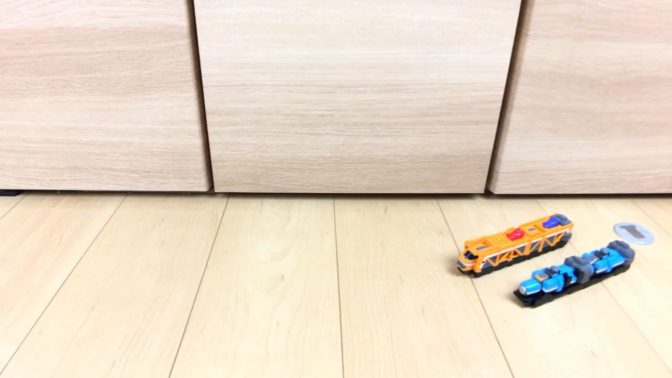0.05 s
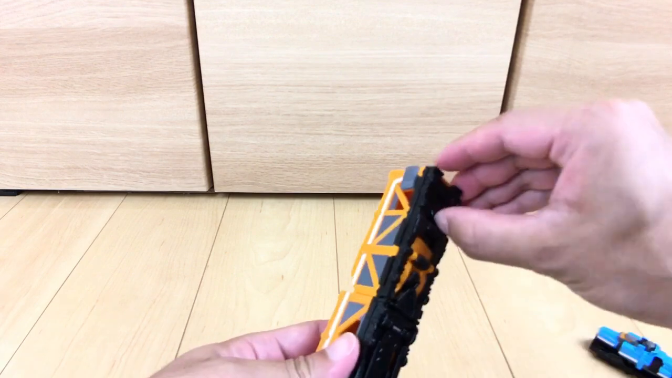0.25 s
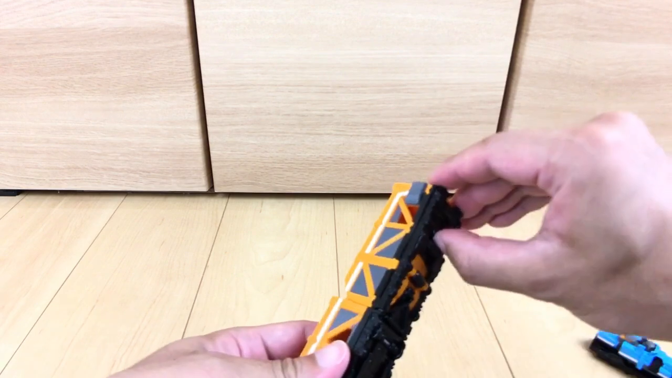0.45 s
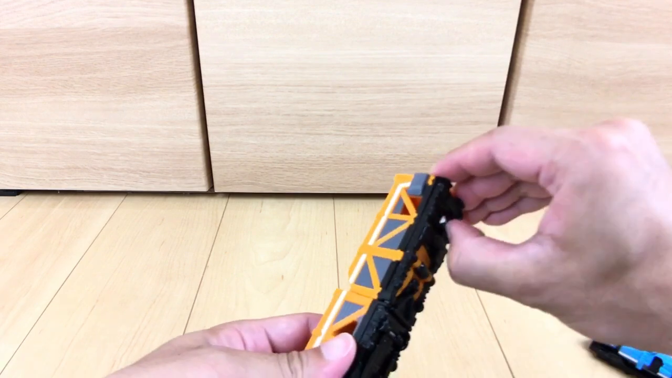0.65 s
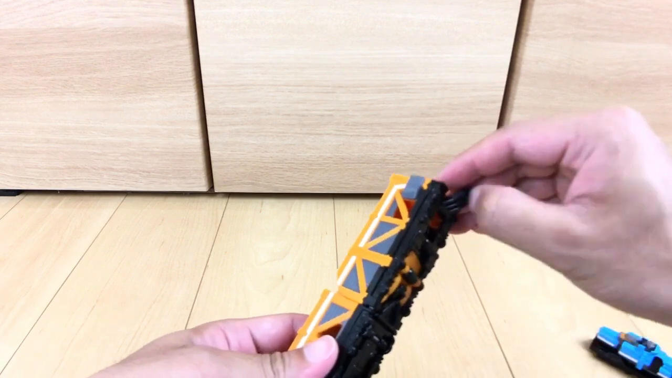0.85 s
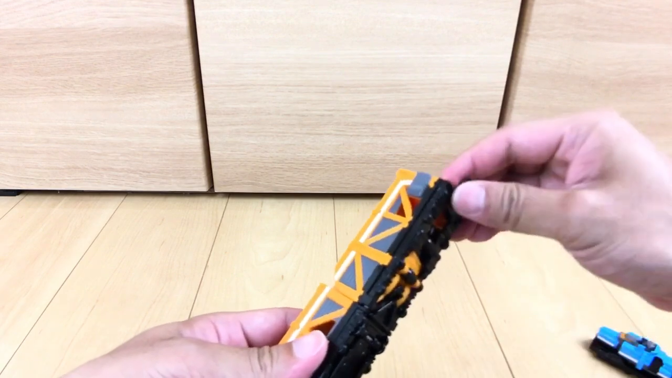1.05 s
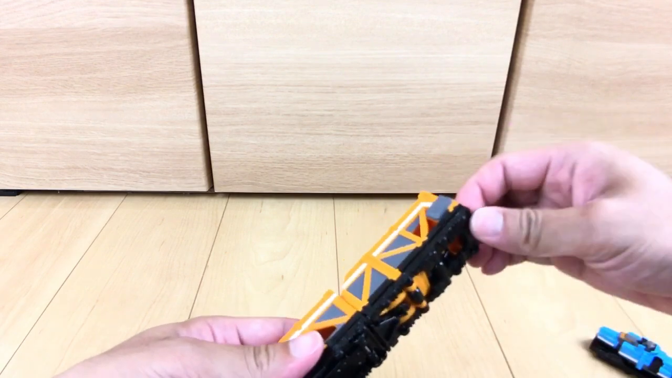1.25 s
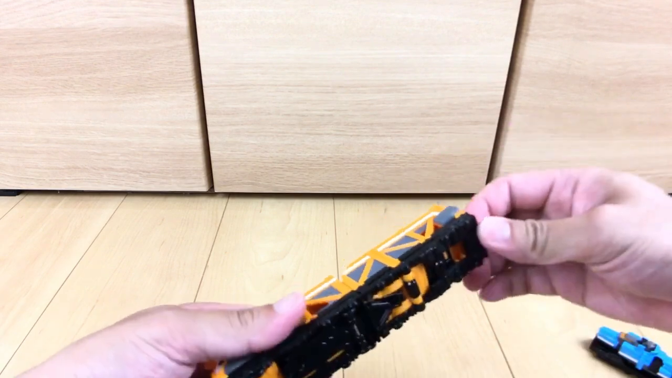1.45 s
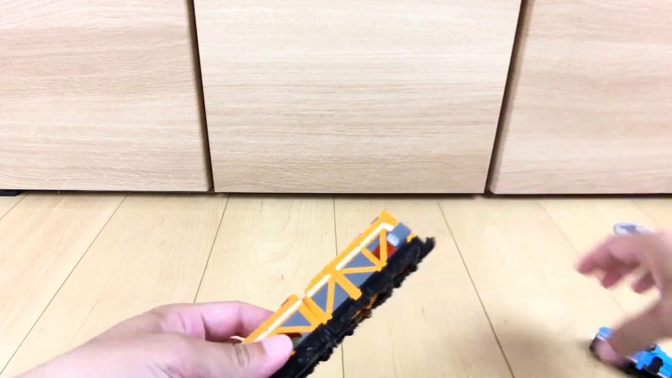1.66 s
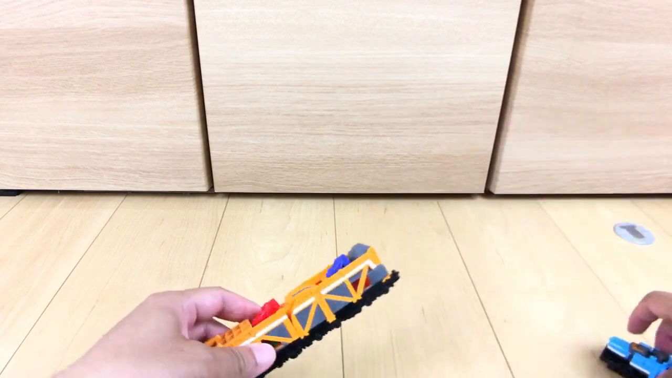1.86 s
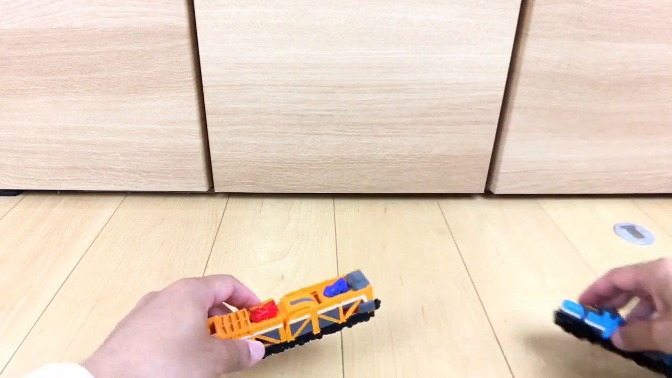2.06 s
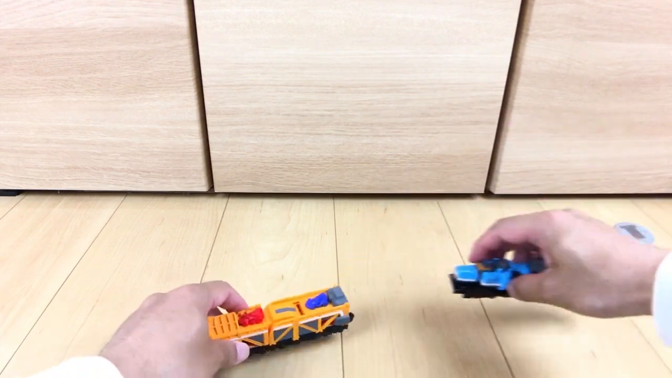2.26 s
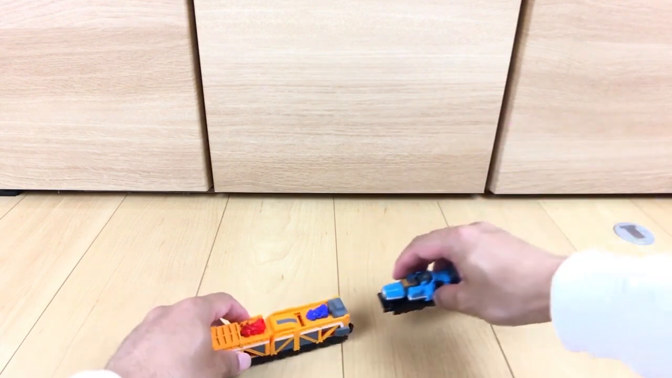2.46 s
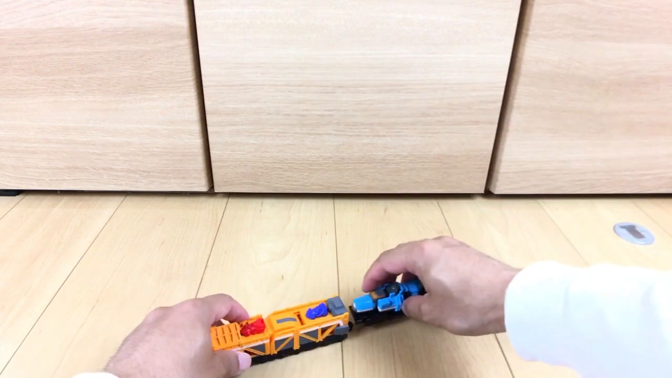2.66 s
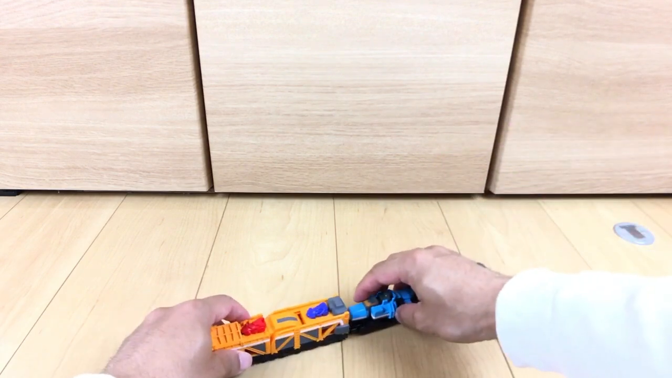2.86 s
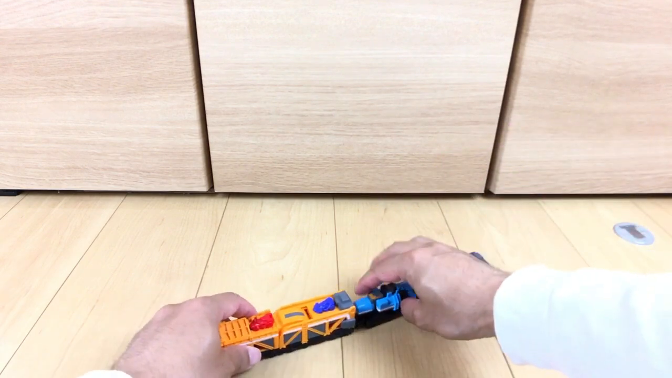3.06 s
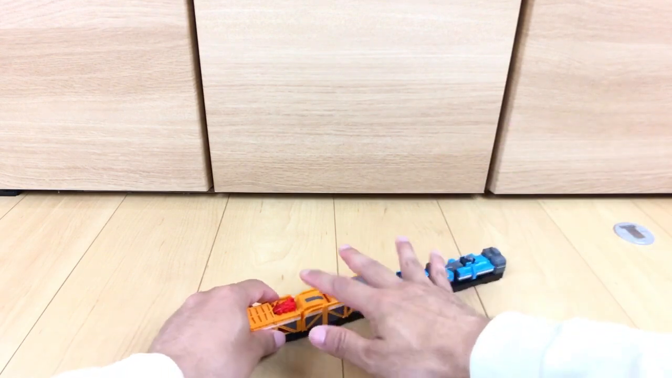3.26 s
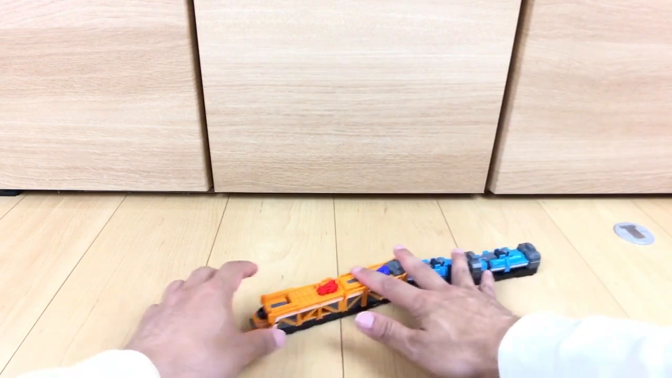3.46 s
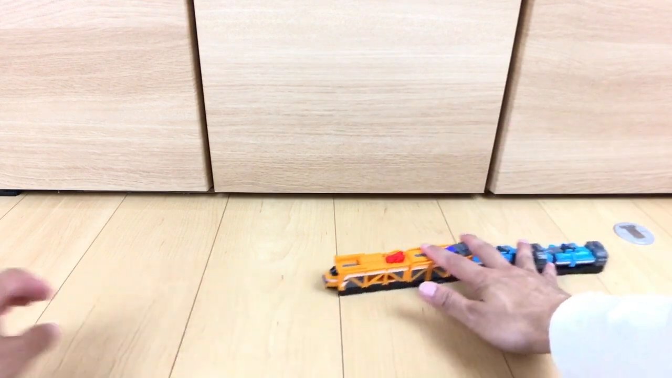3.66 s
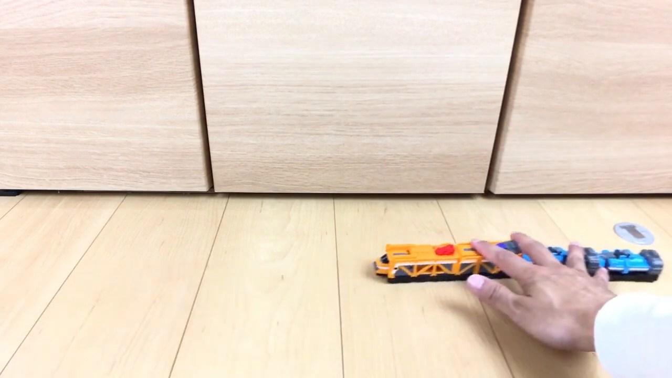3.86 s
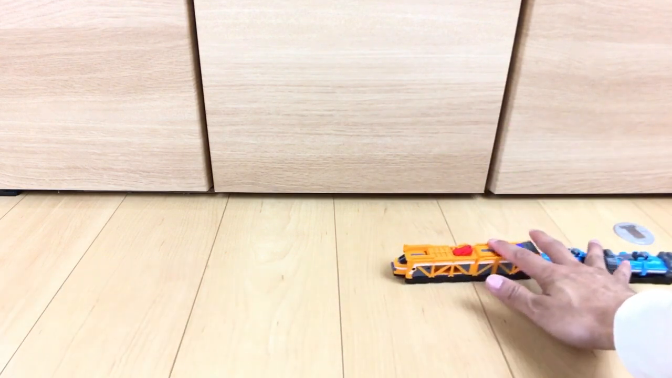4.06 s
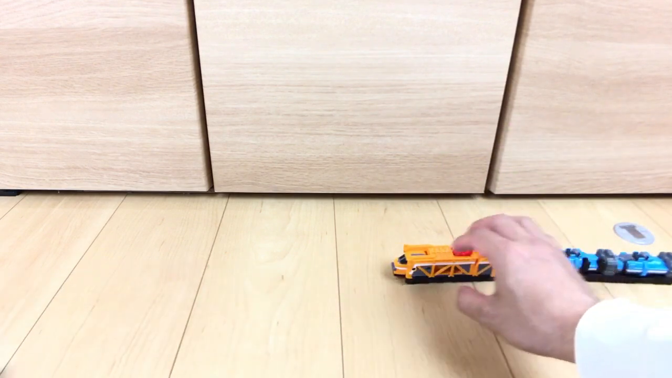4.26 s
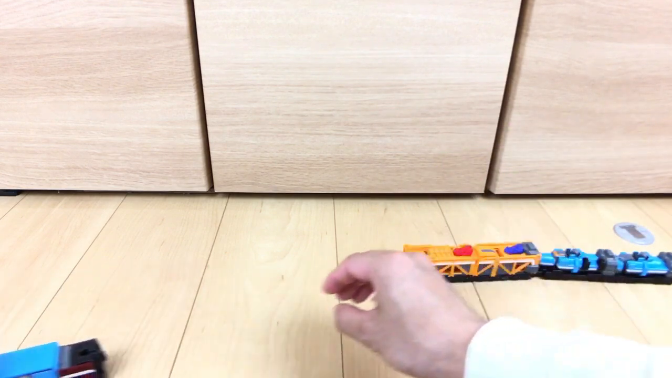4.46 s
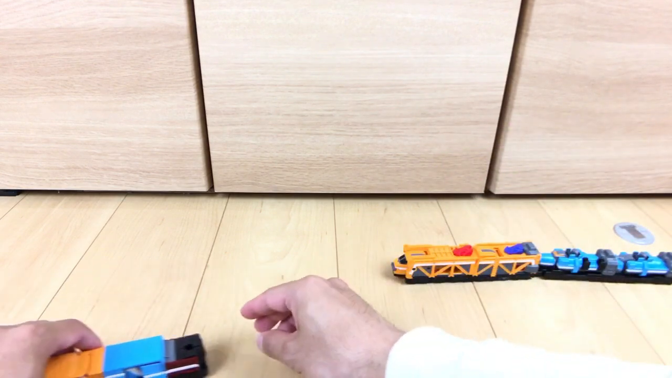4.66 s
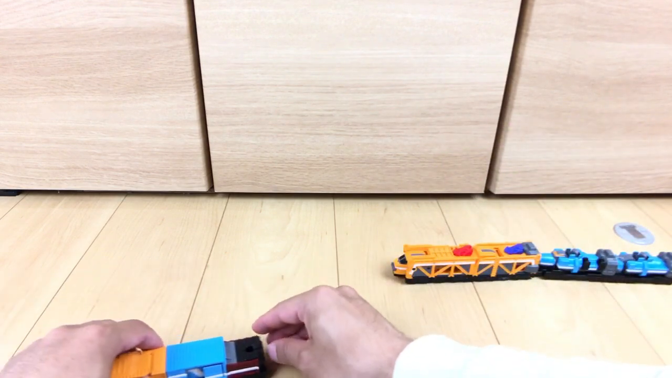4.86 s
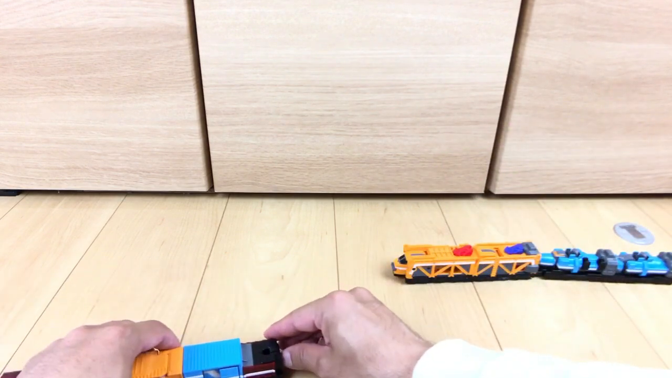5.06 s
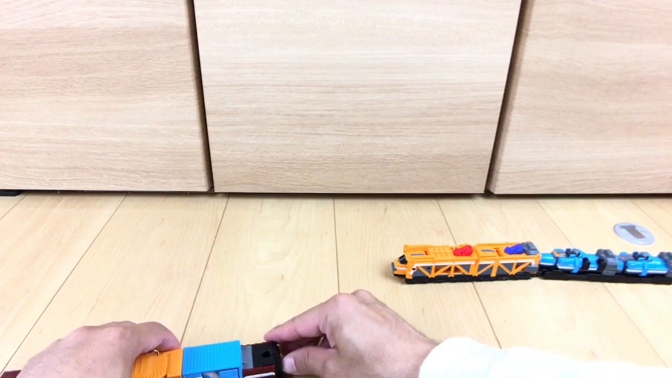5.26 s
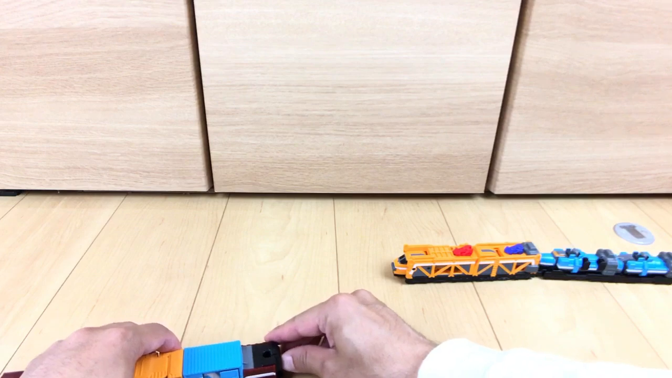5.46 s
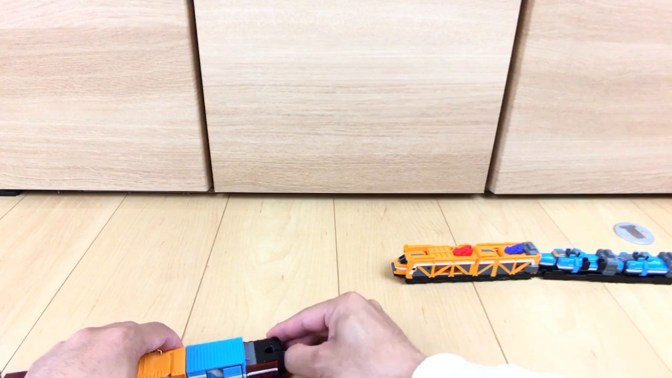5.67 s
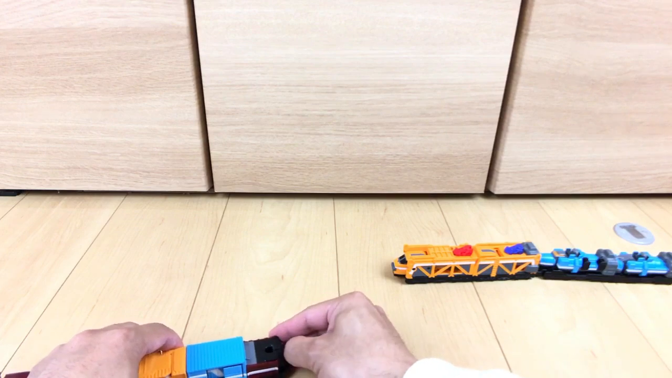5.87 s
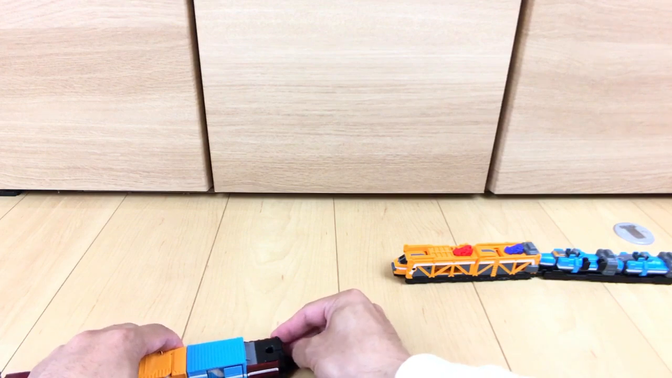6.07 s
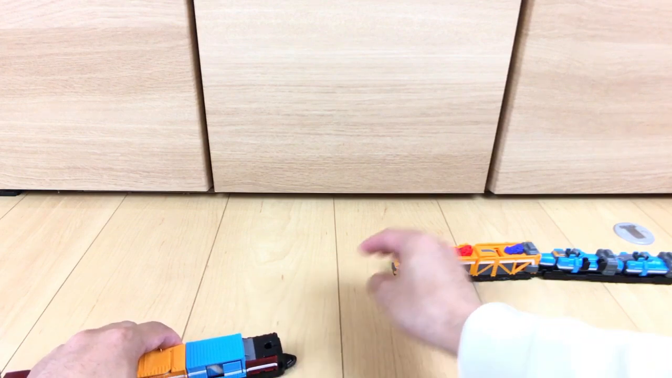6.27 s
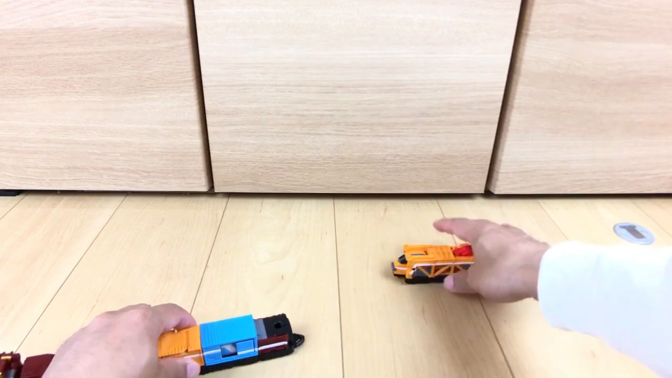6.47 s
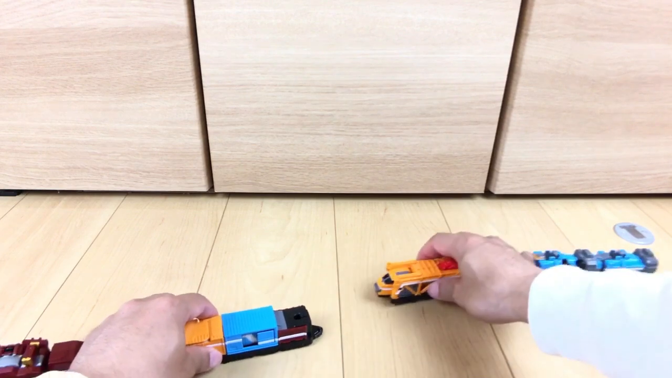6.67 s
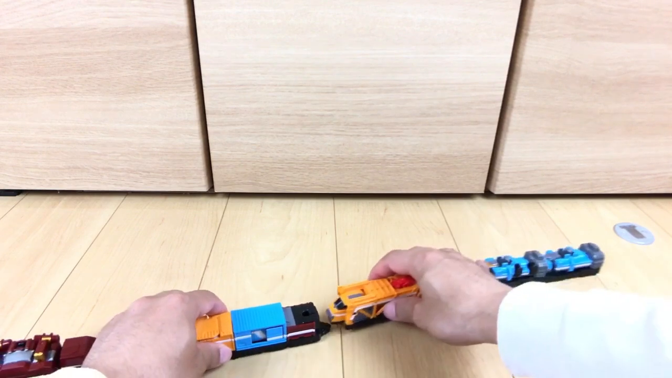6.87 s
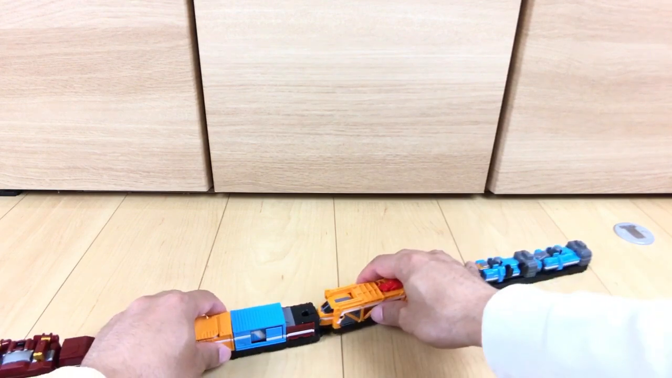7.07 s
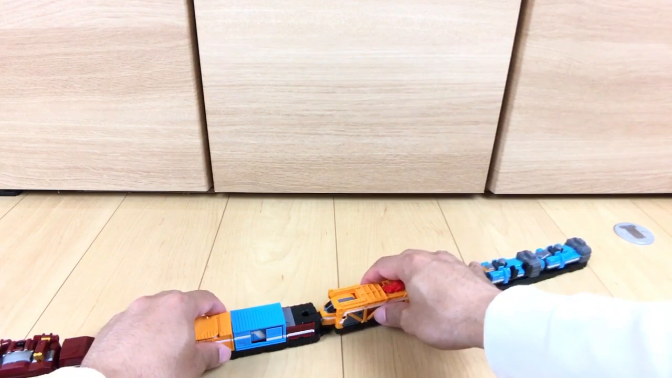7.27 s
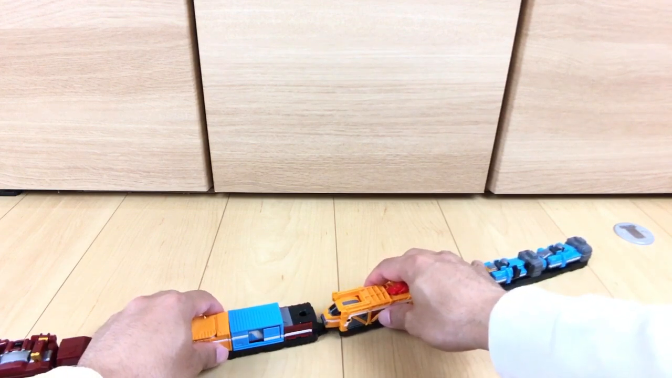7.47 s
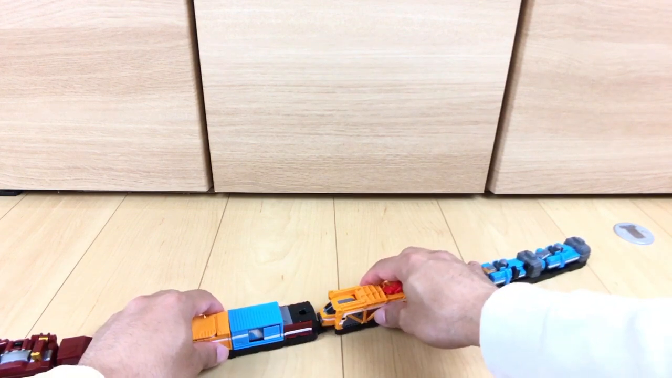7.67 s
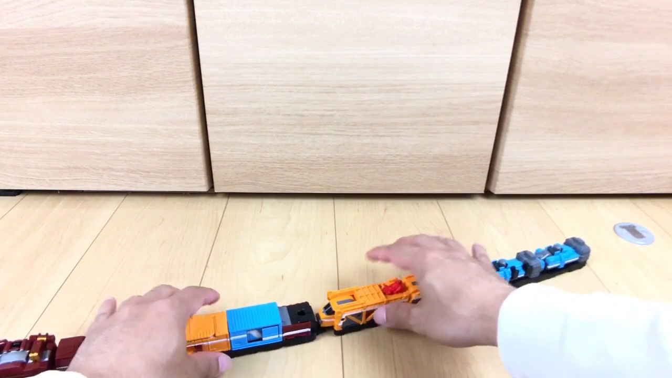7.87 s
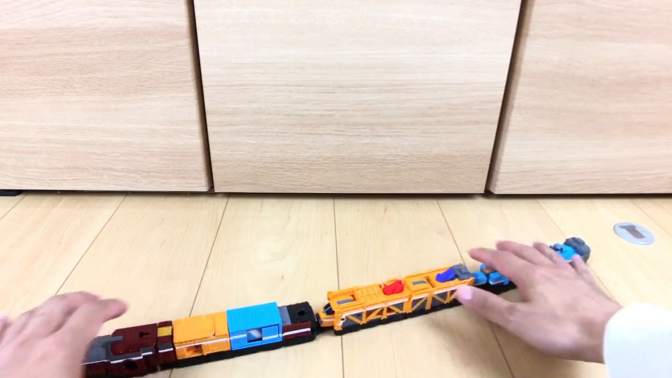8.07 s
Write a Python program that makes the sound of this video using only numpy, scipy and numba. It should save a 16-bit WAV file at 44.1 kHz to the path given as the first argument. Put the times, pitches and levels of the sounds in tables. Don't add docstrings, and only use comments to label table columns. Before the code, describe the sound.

Thin plastic coupling clicks in the fingers, then toy cars clack down on floorboards, snap together and roll with a chattering rumble.

```python
import sys
import numpy as np
from scipy import signal
from scipy.fft import rfft, irfft
from scipy.io import wavfile
from scipy.ndimage import uniform_filter1d
from numba import njit

SR = 44100
rng = np.random.default_rng(int(sys.argv[2]) if len(sys.argv) > 2 else 0)


def int16_out(signal):
    q = np.round(np.clip(np.atleast_2d(signal).T, -1, 1) * 32767)
    wavfile.write(sys.argv[1], SR, q.astype(np.int16))


def how_loud(loudness_db):
    steps = np.asarray(loudness_db, float) / 20
    return 10 ** steps


N = 358091

# freq_hz [Hz], level_db [dB per Hz]
PLASTIC = [(290, -27), (500, -17), (623, 2), (742, -28.5), (1260, -15), (1640, -13), (2040, -10.5),
           (2430, -4.5), (4490, 4), (8180, -23), (14000, 0.5), (15600, -8.5), (16500, -49)]
# freq_hz [Hz], level_db [dB], t60_s [s]
BOARDS = [(134.9, -16, 0.65), (164, -0.5, 0.18), (210, 3.5, 0.1), (259, -2.5, 0.17), (297.4, 0.5, 0.16),
          (329, -15, 0.26), (440.6, -13.5, 0.13)]


def unit(x):
    return x / np.sqrt(np.mean(x ** 2))


def fade(t, t60_s):
    return np.exp(-np.log(1000) * t / t60_s)


def colour(x, points):
    hz, db = np.transpose(points)
    f = np.maximum(np.fft.rfftfreq(len(x), 1 / SR), 1)
    gain = how_loud(np.interp(np.log(f), np.log(hz), db))
    return irfft(rfft(x) * gain, len(x))


def band(x, lo_hz, hi_hz):
    edges_hz = [lo_hz, min(hi_hz, 0.45 * SR)]
    return signal.sosfilt(signal.butter(3, edges_hz, "bandpass", fs=SR, output="sos"), x)


@njit
def svf(x, hz, width_hz):
    y, state_band, state_low = np.empty(len(x)), 0., 0.
    for i in range(len(x)):
        g = np.tan(np.pi * hz[i] / SR)
        k = width_hz / hz[i]
        v = (state_band + g * (x[i] - state_low)) / (1 + g * (g + k))
        state_band = 2 * v - state_band
        state_low += 2 * g * v
        y[i] = k * v
    return y


def fixed_hz(hz):
    return np.full(N, 1. * hz)


def walk(rate_hz):
    k = int(SR / rate_hz)
    held = np.repeat(rng.standard_normal(N // k + 1), k)
    return 1.2 * uniform_filter1d(held, k)[:N]


def add(out, start_s, sound):
    at = int(start_s * SR)
    out[at:at + len(sound)] += sound


def hum():
    hum_spectrum = [(20, -17), (32, -4), (65, 3.5), (130, -5.5), (200, -12.5), (320, -21.5), (700, -30.5),
                    (1700, -34), (4400, -31), (7500, -40.5), (10500, -38.5), (13500, -30), (15600, -35),
                    (16000, -73.5)]
    return how_loud(-55.5) * unit(colour(rng.standard_normal(N), hum_spectrum))


def push_layers():
    # time_s [s], effort_db [dB], press_db [dB, extra on boards], rumble_hz [Hz]
    pushes = [
        [(0.0, -36, -7.5, 209), (0.07, -51, 7.5, 203), (0.15, -50, 1.5, 190)],
        [(2.83, -57, -35, 225), (2.91, -51.5, -6, 225), (3.03, -50, -3.5, 231), (3.184, -44, -4, 230),
         (3.32, -45.5, 2.5, 233)],
        [(3.33, -33.5, -12, 269), (3.375, -36, -6, 279), (3.395, -30.5, 2.5, 286), (3.456, -33.5, 3.5, 254),
         (3.52, -29.5, 1.5, 273), (3.63, -29.5, 3.5, 286), (3.69, -33.5, 0.5, 224.4), (3.75, -33, 6, 241),
         (3.86, -44, -8.5, 283.5)],
        [(4.08, -50.5, -0.5, 170), (4.14, -39, 4, 170.3), (4.28, -33.5, 4.5, 172), (4.38, -33.5, 6, 175.7),
         (4.5, -32.5, -2, 159.5), (4.68, -35.5, 4, 153.4), (4.84, -41, 2.5, 157.5), (4.91, -38, 5.5, 153),
         (5.03, -64.5, -2, 185)],
        [(6.2, -68, -3, 200), (6.222, -66.5, -12, 200), (6.3, -67, 2, 203), (6.384, -56.5, 2, 241.5),
         (6.396, -50.5, -7.5, 236), (6.45, -49.5, 3.5, 204), (6.485, -59, 3, 210)],
        [(6.5, -48, 2.5, 253), (6.56, -37.5, 1.5, 286), (6.586, -40, 2, 290), (6.63, -41.5, 3.5, 272),
         (6.686, -41, 4.5, 335), (6.776, -38.5, -4.5, 312), (6.88, -45, 1, 274), (6.93, -49, 2, 220),
         (7.02, -72.5, 8, 278)],
    ]
    shuffles = [
        [(1.725, -65, 0.0048, 286), (1.79, -52, 0.003, 315), (1.86, -45.5, 0.0037, 314), (1.93, -52, 0, 301),
         (2.015, -46, 0.0027, 310), (2.06, -96, 0, 310)],
        [(3.87, -51, 0.0051, 265), (3.912, -57, 0, 280), (4.07, -59, 0.0043, 312)],
        [(5.45, -58, 13, 243), (5.536, -70.5, -0.5, 251), (5.8, -67.5, 7, 263), (5.9, -83, -3, 260),
         (5.962, -61, 3, 270), (6.066, -61, 7, 270), (6.14, -69, 6, 273)],
        [(7.06, -66.5, 1, 248), (7.27, -69.5, -5.5, 241), (7.36, -60.5, 1, 231), (7.45, -70.5, 10, 230),
         (7.55, -72.5, 3, 218), (7.62, -43.5, -4.5, 227.6), (7.72, -61.5, -4, 220), (7.86, -75.5, -2, 217.5)],
        [(5.06, -73, 0.47, 210), (5.25, -78.5, 0.5, 210), (5.42, -72.5, 0.5, 210)],
    ]
    # rumble_db [dB], body_db [dB], wide [0-1, shared rumble], song_db [dB]
    loads = [(-34, -45.5, 0.51, 1.5), (-41, -55.5, 1, -5), (-36.5, -55, 0, -6.5), (-36.5, -47, 0.49, -4.5),
             (-36, -48, 0.76, 3), (-38.5, -52.5, 0.58, 0.5), (-42.5, -53, 0.58, -2), (-35.5, -64, 0.68, 5),
             (-43, -39, .95, 0.), (-37, -45.5, 0.67, 3.5), (-41, -43.5, 0.64, -3)]
    mid_effort_db, mid_bright_db = -38.5, -50.5
    bright_slope, hollow_slope, rumble_slope = 1, 0.82, 0.66
    out = []
    for push, (rumble_db, body_db, wide, song_db) in zip(pushes + shuffles, loads):
        s, effort_db, press_db, hz = np.transpose(push)
        over_db = effort_db - mid_effort_db
        out.append(np.transpose([
            s, effort_db,
            mid_bright_db + bright_slope * over_db,
            body_db + hollow_slope * over_db,
            rumble_db + rumble_slope * over_db + press_db,
            hz, wide + 0 * s, song_db + 0 * s]))
    return sorted(out, key=lambda rows: rows[0, 0])


def axle_clumps():
    ticks = (rng.random(N) < 450 / SR) * how_loud(2.7 * rng.exponential(size=N))
    cracks = signal.lfilter([1], [1, -fade(1 / SR, 0.011)], ticks)
    return uniform_filter1d(cracks, 16) + 0.65


def wall_scrape(clumps, chatter_db, bright_db, song_db):
    # freq_hz [Hz], width_hz [Hz], level_db [dB]
    wall_modes = [(2073, 1000, -16.5), (2800, 260., -18.5), (4450, 150, -9), (5230, 290, -15.5)]
    # start_s [s], end_s [s], freq_hz [Hz], level_db [dB over scrape]
    pressed_songs = [(4.34, 4.42, 2050, -19), (4.717, 4.99, 2090, -12.5), (6.376, 6.465, 2120, -0.5),
                     (6.379, 6.465, 2820, -7), (6.435, 6.48, 3830, 3), (6.68, 6.78, 2650, -10),
                     (6.819, 6.93, 2450, -8), (6.755, 6.87, 5400, -10), (0.0, 0.116, 690, -5.5),
                     (4.39, 4.68, 1250, -15.5), (7.002, 7.045, 2370, 11), (7.755, 7.786, 2920, 5)]
    song_width_hz = 220
    t = np.arange(N) / SR
    grit = colour(rng.standard_normal(N) * clumps * how_loud(0.76 * walk(30)), PLASTIC)
    scrape = band(grit, 1665, 3740) * how_loud(1.8 * walk(8.3))
    scrape += band(grit, 3310, 8500) * how_loud(0.36 * walk(29))
    plain = rng.standard_normal(N) * clumps
    sing, held = np.zeros(N), np.zeros(N)
    for hz, width_hz, db in wall_modes:
        level = how_loud(db + 4.1 * walk(6.6))
        sing += level * unit(svf(plain, hz * (1 + 0.036 * walk(4)), width_hz))
    for start_s, end_s, hz, db in pressed_songs:
        gate = uniform_filter1d(1. * (t > start_s) * (t < end_s), 400)
        tone = svf(svf(plain, fixed_hz(hz), song_width_hz), fixed_hz(hz), 2 * song_width_hz)
        held += how_loud(db) * gate * unit(tone)
    shell = held + unit(scrape) + how_loud(song_db) * band(sing, 1600, 6500)
    treble = unit(band(grit * clumps ** 0.13, 6500, 22000))
    return how_loud(chatter_db + 3.0) * shell + how_loud(bright_db + 5.5) * treble


def hollow_body(clumps, body_db):
    cavity_modes = [(615.4, 35, 1), (1250, 280, -2), (2047, 130, 0.5), (2770, 230, -8)]
    rub = rng.standard_normal(N) * clumps ** 0.5 * how_loud(2.6 * walk(12))
    hollow = unit(band(signal.lfilter([1], [1, -0.9], rub), 480, 2500))
    for hz, width_hz, db in cavity_modes:
        level = how_loud(db + 2.1 * walk(5))
        hollow += level * unit(svf(rub, hz * (1 + 0.017 * walk(7)), width_hz))
    return how_loud(body_db - 3.0) * hollow


def board_rumble(rumble_db, hz, wide):
    width_hz = 60.
    bumps = rng.standard_normal(N) * how_loud(1.9 * walk(20))
    hz, wide = np.clip(hz * (1 + 0.023 * walk(13)), 60, 600), np.clip(wide, 0, 1)
    many = unit(band(bumps, 133.6, 366))
    for board_hz, db, _ in BOARDS:
        many += how_loud(db / 3 - 15.0) * unit(svf(bumps, fixed_hz(board_hz), 30.0))
    drone = unit(svf(svf(bumps, hz, width_hz), hz, width_hz))
    drone = unit(drone / (uniform_filter1d(np.abs(drone), 500) + 0.17) ** 0.37)
    octave = unit(svf(np.abs(drone), 2 * hz, 2 * width_hz))
    rumble = (1 - wide) * (drone + how_loud(-26) * octave) + wide * unit(many)
    return how_loud(rumble_db + 5.5) * rumble


def rolling(pushes):
    t = np.arange(N) / SR
    moving = np.zeros(N)
    for rows in pushes:
        moving += (t >= rows[0][0]) & (t <= rows[-1][0] + 0.02)
    moving = uniform_filter1d(moving.clip(0, 1), 400)
    rows = np.vstack(pushes)
    curves = [np.interp(t, rows[:, 0], column) for column in rows[:, 1:].T]
    chatter_db, bright_db, body_db, rumble_db, hz, wide, song_db = curves
    clumps = axle_clumps()
    steady = wall_scrape(clumps, chatter_db, bright_db, song_db)
    steady += hollow_body(clumps, body_db) + board_rumble(rumble_db, hz, wide)
    edge = signal.ellip(8, 0.2, 60, 15800, fs=SR, output="sos")
    return signal.sosfilt(edge, moving * steady)


def room(x):
    t = np.arange(int(0.5 * SR)) / SR
    decay = np.zeros(len(t))
    for t60_s, db in [(0.1, -12), (0.23, -10.5)]:
        decay += how_loud(db) * unit(fade(t, t60_s)) / np.sqrt(len(t))
    tail = rng.standard_normal(len(t)) * (t > 0.003) * decay
    soft = signal.lfilter([0.6], [1, -0.4], tail)
    return signal.fftconvolve(x, soft)[:N]


def body_level(base_db, db):
    return base_db - 0.21 * (db + 25)


def click(ring_hz, bright_db, body_db, body_hz, slack, tone_db, low_edge):
    noise, detune, mode_db = rng.standard_normal(4086), rng.standard_normal(5), rng.standard_normal(5)
    t = np.arange(len(noise)) / SR
    rise = 1 - np.exp(-(t / (0.00077 * slack ** 2)) ** 2)
    crack = colour(noise, PLASTIC) * rise * fade(t, 0.017 * slack)
    hz = ring_hz * (1 + 0.0715 * detune * np.array([0, 0.5, 1, 1, 1]))
    level = how_loud(3 * mode_db + np.array([5, 0, 0, 0, 0]))
    modes = (level[:, None] * np.sin(2 * np.pi * hz[:, None] * t)).sum(axis=0)
    modes = modes * rise * fade(t, 0.016 * slack)
    knock = signal.lfilter([1], [1, -0.93], noise) * rise * fade(t, 36 / body_hz)
    tone = 0.56 * how_loud(tone_db - 0.21 * (bright_db + 9))
    ring = band(unit(crack) + tone * unit(modes), low_edge * ring_hz, 12000)
    parts = [band(ring, 1380, 7000),
             band(crack * fade(t, 0.062), 9600, 28000),
             band(knock, body_hz, 4300)]
    ring, bright, body = (p / np.abs(p).max() for p in parts)
    near = ring + how_loud(bright_db) * bright + how_loud(body_db) * body
    lag = int(0.0031 * SR)
    return near + 0.17 * np.r_[np.zeros(lag), near[:-lag]]


def hand_contacts():
    # start_s [s], peak_db [dB], ring_hz [Hz], bright_db [dB], body_db [dB]
    fingered = [(0.2, -33, 3620, -41, -7.5), (0.403, -35, 3700, -20, -27), (0.471, -36, 4350, -7, -32),
                (0.485, -14.5, 4200, -5, -29.5), (0.676, -22.5, 4080, -5, -37),
                (0.7032, -26, 4400, -8, -27), (0.7096, -27.5, 3900, -25, -31),
                (0.8088, -18.5, 3370, -15.5, -33), (0.828, -31, 3530, -16, -27),
                (0.95, -23.5, 4090, -16, -26), (0.963, -29.5, 4600, -2, -23), (1.019, -29, 3760, -39, -37),
                (1.031, -24.5, 3400, -11, -33), (1.0455, -17, 3800, -14, -33),
                (1.0499, -17.5, 4400, -2, -25.5), (1.1891, -29.5, 3900, -29, -32),
                (1.218, -21.5, 3430, -14, -31), (1.2587, -21.5, 4040, -10, -30),
                (1.3215, -25.5, 2740, -16, -21), (1.369, -27.5, 3630, -14, -30),
                (1.4225, -31.5, 4280, -9, -25), (1.457, -14.5, 4440, -8, -35), (1.478, -32, 4200, -4, -20),
                (1.531, -42.5, 3850, -5.5, -25), (1.558, -43, 3860, -7, -25)]
    # start_s [s], peak_db [dB], ring_hz [Hz], bright_db [dB]
    swivel = [(0.527, -18.5, 4280, -11), (0.545, -12.5, 4760, -12), (0.5615, -10, 4340, -16),
              (0.572, -10.5, 4200, -14), (0.5804, -12, 4200, -2.5), (0.588, -23, 3550, -3),
              (0.5965, -18.5, 4200, -2.5), (0.605, -18.5, 4200, -7), (0.615, -23, 4430, -16),
              (0.6255, -23.5, 3440, -8), (0.643, -14.5, 3480, -19), (0.6532, -23, 4230, 5.5)]
    out = np.zeros(N + SR)
    rows = [(*row, 0.9) for row in fingered]
    rows += [(*row, body_level(-67, row[1]), 0.75) for row in swivel]
    for s, db, hz, bright_db, body_db, slack in rows:
        sound = click(hz, bright_db, body_db, 1200, slack, tone_db=-0.5, low_edge=0.72)
        add(out, s, how_loud(db - 1.0) * sound)
    return out[:N]


def thumps():
    board_blows = [(1.938, -35, 314.6, 0.13), (2.401, -18.5, 148, 0.1), (2.731, -32.5, 230, 0.14),
                   (3.04, -23, 154, 0.072), (3.164, -36.5, 214, .1), (3.389, -19.5, 191.5, 0.15),
                   (3.49, -22, 152, 0.11), (1.732, -38, 417, 0.092), (4.141, -13.5, 165, 0.1),
                   (5.431, -25.5, 199, 0.16), (5.772, -28.5, 128, 0.19), (5.974, -16, 335, 0.082),
                   (7.347, -37, 202, .1), (7.574, -22, 159, 0.09), (7.597, -24.5, 306.5, 0.12)]
    t, out = np.arange(SR // 4) / SR, np.zeros(N + SR)
    for s, db, hz, t60_s in board_blows:
        swing = np.sin(2 * np.pi * hz * t) * (1 - fade(t, 0.033)) * fade(t, t60_s)
        add(out, s, how_loud(db) * swing)
    return out[:N]


def thud():
    t = np.arange(int(0.3 * SR)) / SR
    ring = np.zeros(len(t))
    for hz, db, t60_s in BOARDS:
        weight, detune = rng.standard_normal(2)
        mode = np.sin(2 * np.pi * hz * (1 + 0.048 * detune) * t)
        ring += how_loud(db + 3.0 * weight) * mode * fade(t, t60_s)
    ring = ring * (1 - fade(t, 0.01))
    return ring / np.abs(ring).max()


def floor_contacts():
    # start_s [s], peak_db [dB], ring_hz [Hz], bright_db [dB], thud_db [dB]
    knocks = [(1.737, -28, 4620, -1, -10.5), (1.8422, -26, 4100, 2, -11), (1.942, -18, 3700, -7.5, -14.5),
              (1.9543, -15.5, 4450, -13, -28.5), (2.7103, -13, 4300, -7, -20.5),
              (2.7348, -3.5, 4090, 2, -23), (2.7945, -5, 4270, -13, -29), (2.9196, -21.5, 3820, -15, -23),
              (3.0408, -20, 4200, -5.5, -13.5), (3.1721, -20.5, 4550, -4, -10.5),
              (3.6135, -7.5, 4440, -16, -25), (4.2027, -19.5, 4860, -2, -10), (4.991, -26, 4360, -6, -17.5)]
    latches = [(5.2047, -29.5, 4930, -11, -17.5), (5.335, -31, 4040, -8, -25), (5.4313, -8, 4510, -4, -15),
               (5.6095, -23.5, 5100, 0, -28), (5.7389, -29.5, 4740, -6, -18),
               (5.7728, -1.5, 4400, -7, -29.5), (5.9186, -20, 4960, -5, -17.5), (5.9668, -8, 5020, -7, -23),
               (6.0401, -15.5, 4940, -6.5, -16.5), (6.569, -8, 4580, -22, -24.5),
               (6.784, -16.5, 4450, 1, -15), (7.006, -23, 3170, -16, -22), (7.095, -33.5, 4130, -29, -11),
               (7.1773, -25.5, 4300, -15, -11.5), (7.211, -30, 3730, -25, -13),
               (7.3149, -45, 4500, -23, 6.5), (7.349, -28.5, 4740, -22, -8), (7.432, -25, 4450, -7.5, -12),
               (7.5795, -10, 6100, -21, -20), (7.5943, -2, 4335, -20, -22),
               (8.0977, -21.5, 4650, 0.5, -12.5)]
    # start_s [s], peak_db [dB], ring_hz
    # [Hz], bright_db [dB]
    rattles = [(1.7474, -30, 4600, -13), (1.808, -34, 5570, -19), (1.973, -26.5, 3810, -13),
               (2, -32, 4370, -3), (2.9568, -32, 4570, -28), (2.971, -28, 3770, -35),
               (3.006, -26.5, 3630, -22), (3.3232, -19.5, 4220, -9), (3.3352, -16, 4510, -28.5),
               (3.3431, -13, 4280, -23), (3.3542, -17.5, 3940, -11.5), (3.404, -10.5, 3830, -20),
               (3.469, -13, 4280, -26), (3.481, -7, 4170, -14), (3.4949, -9, 5560, -11),
               (3.5057, -8.5, 4400, -15), (3.526, -15, 4320, -14), (3.5794, -13, 4300, -17),
               (3.663, -14, 4570, -41.5), (3.7269, -11, 4400, -43), (3.7695, -14, 4110, -11),
               (3.8023, -14, 4200, -25), (3.841, -20, 4110, -1.5), (3.946, -27.5, 4400, -48),
               (3.9923, -21.5, 4200, -20), (4.038, -34, 4470, -35),
               (4.3042, -18.5, 4700, 1.5), (4.3759, -19, 4300, -2), (4.3863, -30, 4450, 7),
               (4.484, -19, 4200, -29.5), (4.581, -25, 4800, 0), (4.676, -21, 3320, -22),
               (5.239, -45, 3640, -15), (5.514, -25.5, 4400, 1), (5.536, -34, 4260, 3),
               (6.0217, -28, 5250, -7), (6.051, -21.5, 3700, -2), (6.1088, -34, 5300, -6),
               (6.218, -43, 2000, -26), (6.5076, -24.5, 4400, -28), (6.5865, -16.5, 4140, -14),
               (6.653, -24.5, 4210, -2), (6.664, -21.5, 4570, -1), (6.883, -18.5, 3320, -10),
               (6.92, -31, 4450, -14), (7.121, -31.5, 3350, -39), (7.144, -33.5, 4050, -33),
               (7.3337, -35.5, 4450, -27), (7.4739, -38.5, 4200, -32), (7.489, -38.5, 4200, -11),
               (7.619, -24, 3760, -9), (8.1077, -22.5, 4580, -6)]
    # start_s [s], peak_db [dB], ring_hz [Hz], bright_db [dB]
    scuffs = [(2.404, -14.5, 3140, -13), (3.306, -26, 4200, -16), (3.386, -16, 4030, -4.5),
              (3.549, -16, 4400, -8), (3.7052, -21, 4030, -23.5), (3.74, -14, 4410, -35),
              (4.1444, -25, 4470, -4), (4.244, -25, 4600, -0.5), (4.3594, -17, 4520, -10),
              (4.395, -14.5, 4450, -12), (4.4565, -23, 4300, -9), (4.499, -14, 4400, -15),
              (4.5744, -20, 4770, -4), (4.7465, -23, 4520, -24), (4.849, -25, 4600, -25),
              (6.253, -50, 3970, -10), (6.278, -46, 3740, -18), (6.298, -49, 3160, -14),
              (6.3574, -44, 2370, -14), (6.3947, -32, 2540, -10), (6.537, -40, 4550, -17),
              (6.562, -12.5, 4660, -22), (7.583, -11.5, 2710, -8.5), (7.604, -18, 4140, -6),
              (1.85, -29, 4000, -13.5), (1.915, -35.5, 4400, -3), (3.162, -21, 4540, -8),
              (7.81, -47.5, 5200, 7), (5.203, -44, 1470, -20), (5.541, -49, 2700, -12),
              (5.657, -44, 1990, -17), (5.707, -51, 1800, -14), (6.057, -30, 2270, -12),
              (2.918, -35, 1480, -22), (4.084, -30, 4490, -12), (4.114, -32, 4740, -11),
              (5.058, -45, 2610, -29), (7.432, -54, 1900, -19), (5.7735, -11, 5590, -7.5),
              (2.795, -15.5, 6480, -9), (5.61, -27, 5700, -25.5), (2.426, -19.5, 3280, -13),
              (5.168, -55, 3250, -20.5), (5.4325, -21, 1390, -25)]
    # start_s [s], peak_db [dB]
    touches = [(1.444, -37), (2.781, -24), (5.412, -48), (5.428, -32), (5.657, -48), (5.706, -46),
               (5.76, -37), (5.764, -24), (5.961, -25), (7.562, -31), (7.568, -27), (7.586, -14),
               (7.992, -53), (8.089, -25)]
    out = np.zeros(N + SR)
    touch_rows = [(*row, 4200, -7) for row in touches]
    rows = [(*row, None, -30, 900, 1.7) for row in rattles + touch_rows]
    rows += [(*row, None, -27, 900, 1.5) for row in scuffs]
    for blows, base_db, slack in [(knocks, -18.5, 1.25), (latches, -14.5, 1.15), (bounces(7), -51, 0.9)]:
        for row in blows:
            slack_here = slack * (1 + 0.0273 * (row[1] + 10))
            rows.append((*row, body_level(base_db, row[1]), 950, slack_here))
    for s, db, hz, bright_db, thud_db, body_db, body_hz, slack in rows:
        low_edge = 0.57 + 0.012 * (db + 19.5) * (slack > 0.93)
        tone_db = 3 if thud_db is None else -1
        add(out, s, how_loud(db - 1.0) * click(hz, bright_db, body_db, body_hz, slack, tone_db, low_edge))
        if thud_db is not None:
            add(out, s, how_loud(db + thud_db + 6.0) * thud())
    return out[:N]


def pops():
    landings = [
        (1.943, -50.5, 510),
        (2.405, -37, 610),
        (2.427, -34.5, 572),
        (2.735, -41.5, 598),
        (5.434, -25.5, 587),
        (5.966, -39, 596),
        (7.58, -39, 571),
        (8.1, -53, 633),
    ]
    t, out = np.arange(SR // 4) / SR, np.zeros(N + SR)
    slap_noise = how_loud(-9.5) * unit(band(rng.standard_normal(N + SR), 560, 890))
    for s, db, hz in landings:
        at = int(s * SR)
        tone = np.sin(2 * np.pi * hz * t) * (1 - fade(t, 0.0089)) * fade(t, 0.062)
        slap = slap_noise[at:at + len(t)] * (1 - fade(t, 0.0076)) * fade(t, 0.038)
        add(out, s, how_loud(db + 9.5) * (tone + slap))
    return out[:N]


def bounces(count):
    drop_s, gap_s, shrink = 2.4037, 0.0216, 0.73
    drop_db, loss_db, bright_db, dull_db = -7, -3, 2, -3
    k = np.arange(count)
    start_s = drop_s + gap_s * (1 - shrink ** k) / (1 - shrink)
    return [(s, drop_db + loss_db * n, 4400, bright_db + dull_db * n, -21.5) for s, n in zip(start_s, k)]


def scene():
    cut_s, cut_fade_s = 0.144, 0.00052
    rolls = rolling(push_layers())
    before = np.clip((cut_s - np.arange(N) / SR) / cut_fade_s, 0, 1)
    hand = hand_contacts()
    toys = floor_contacts() + pops() + thumps() + rolls * (np.arange(N) > SR)
    first = before * (rolls + room(rolls * before))
    after = toys + hand + room(toys + how_loud(-4) * hand)
    return np.tile(first + band(after, 59, 22000) + hum(), (2, 1))


def roll_off(x):
    return signal.sosfilt(signal.butter(12, 16990, fs=SR, output="sos"), x)


def record(dry):
    return roll_off(1.273 * np.tanh(0.74 * dry))


dry = scene()
out = record(dry)
int16_out(out)
```